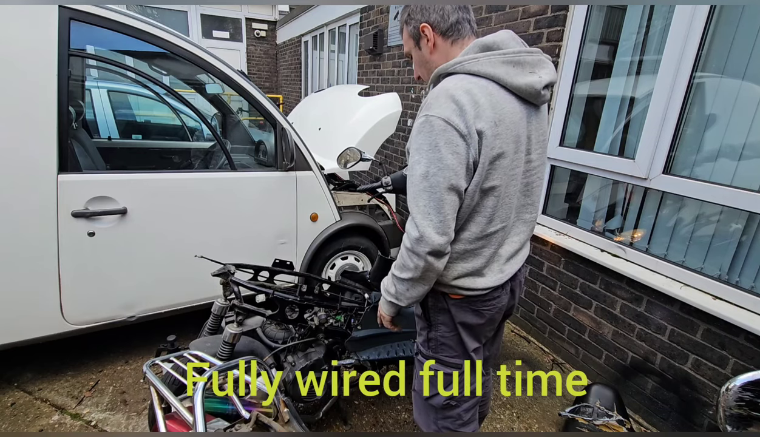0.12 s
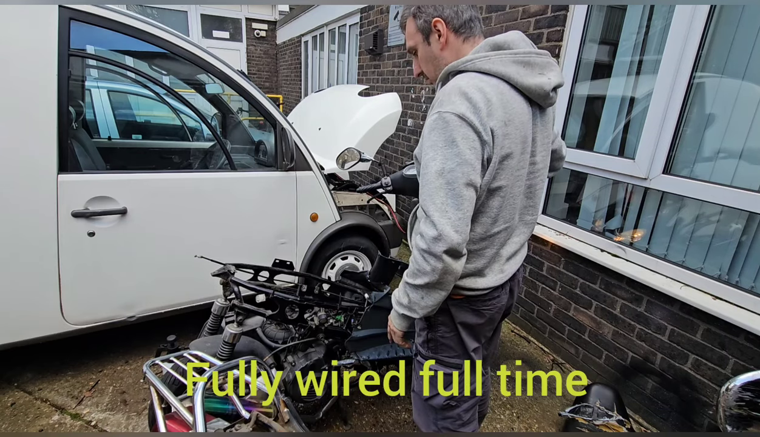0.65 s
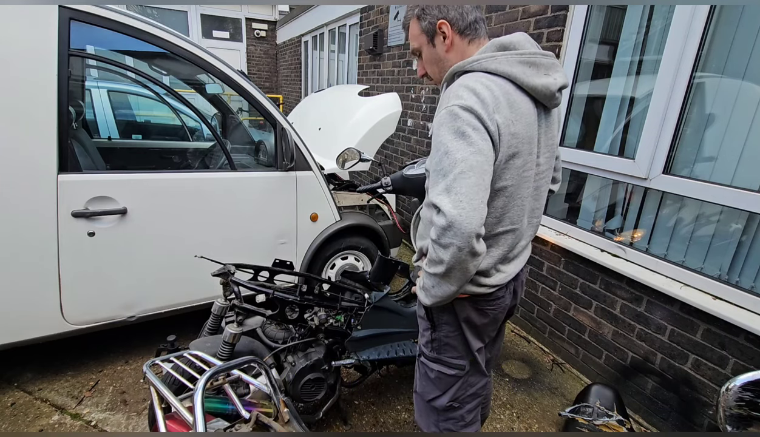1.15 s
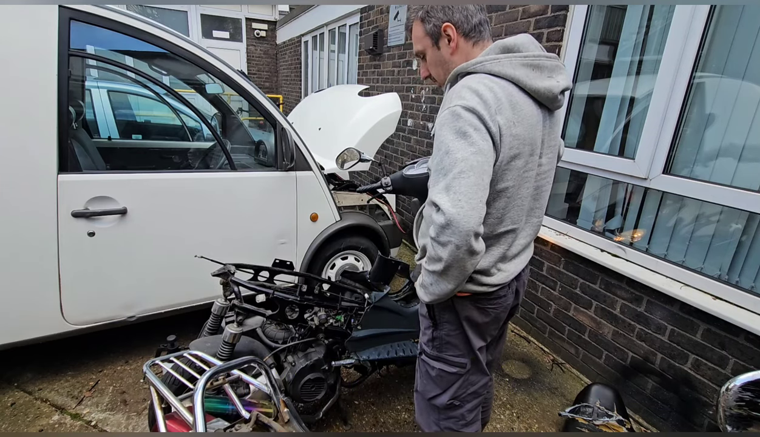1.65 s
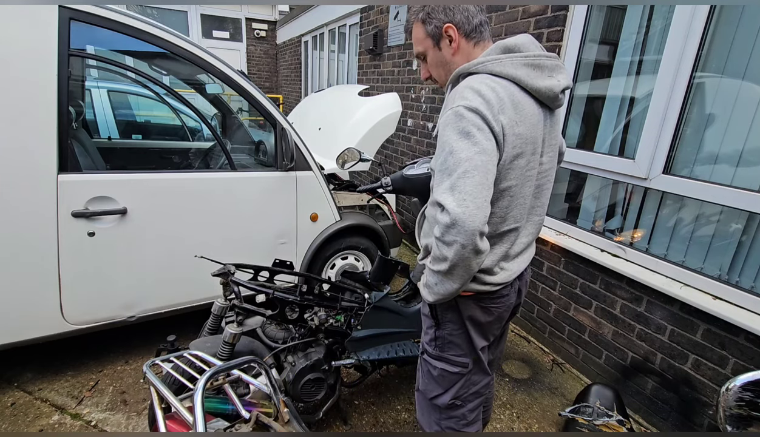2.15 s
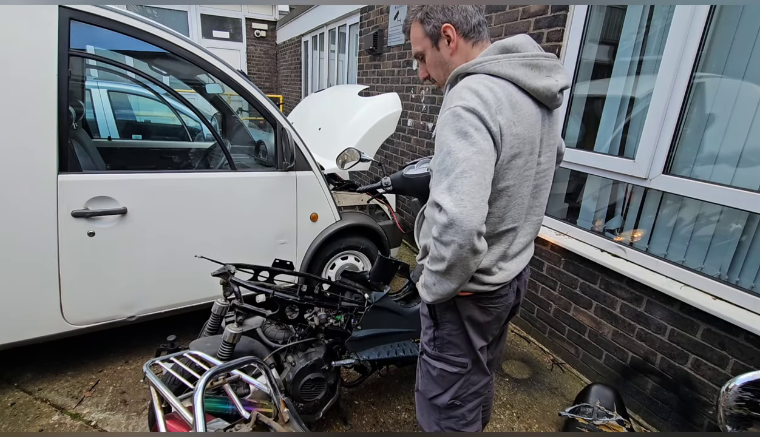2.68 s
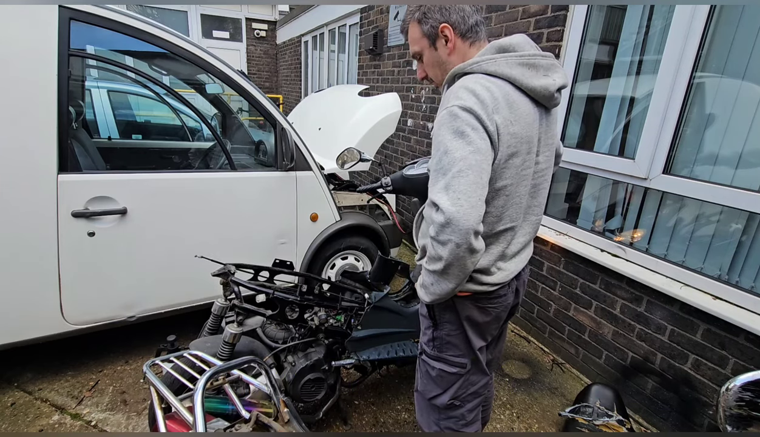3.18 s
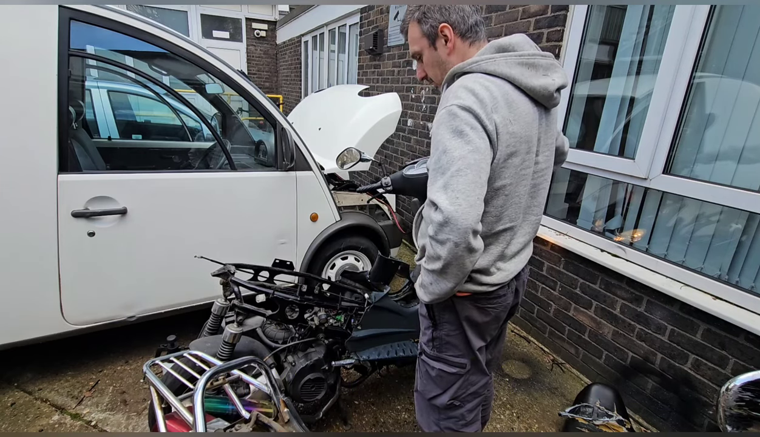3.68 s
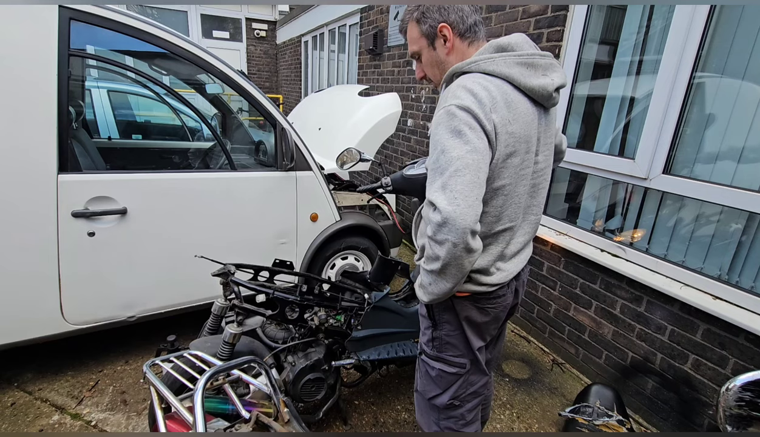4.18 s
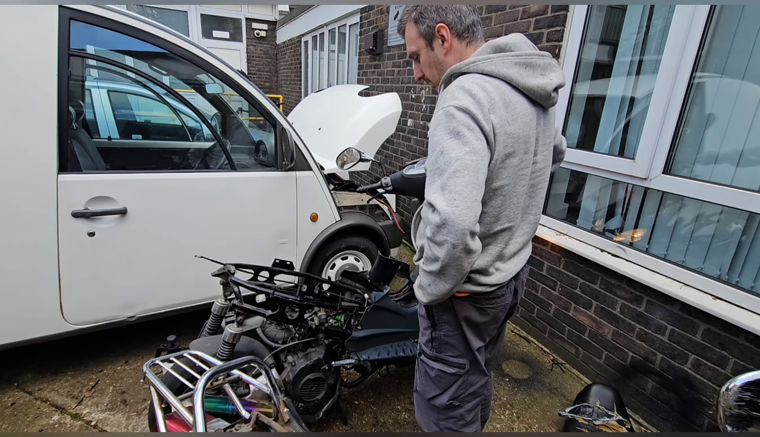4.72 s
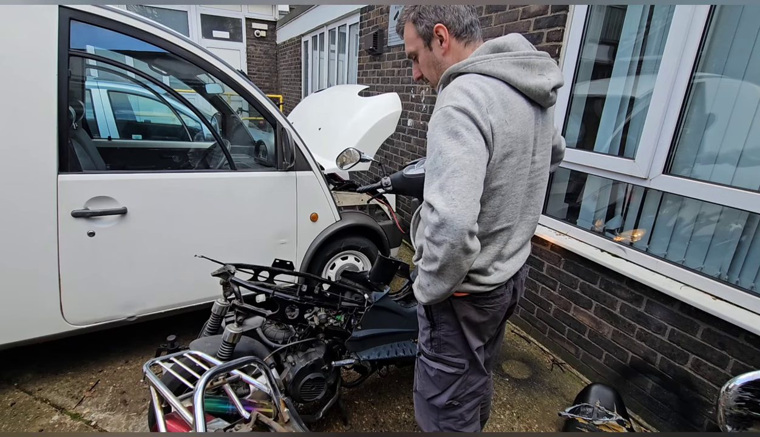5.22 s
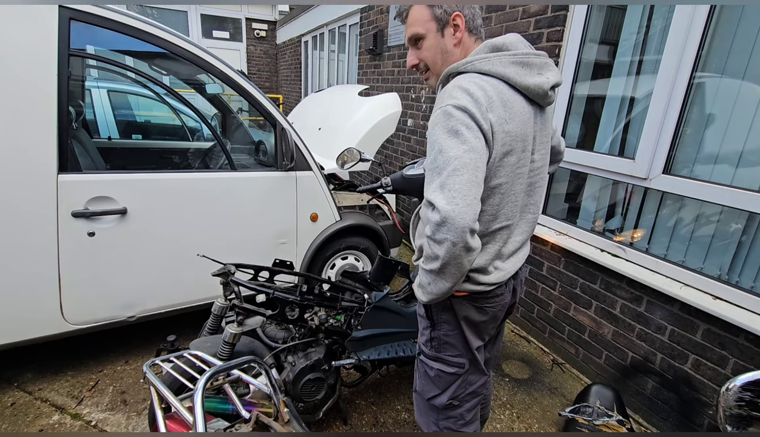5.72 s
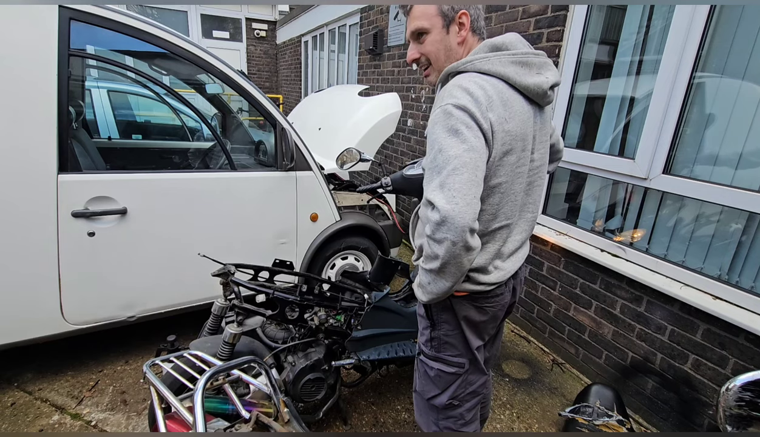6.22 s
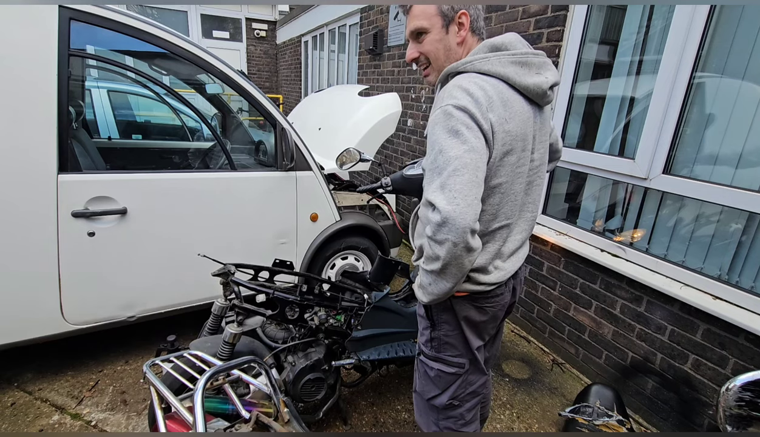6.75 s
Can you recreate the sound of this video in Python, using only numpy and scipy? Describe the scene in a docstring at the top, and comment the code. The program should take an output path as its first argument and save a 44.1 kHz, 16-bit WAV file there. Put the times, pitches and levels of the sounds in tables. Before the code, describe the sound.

From 0 to 2 s a small single-cylinder four-stroke engine idles close by, about ten to twelve soft exhaust thuds a second, each with a hollow silencer shiver, a little puff of gas and crisp metallic valve ticks. At 2.1 s the throttle snaps open: the beat doubles and a hard intake bark appears. Quick blips follow at 2.7, 3.1 and 3.7 s, each rising, then sagging with a small exhaust thump as it shuts. From 4.25 to 5.3 s a longer pull climbs steeply; the separate strokes fuse into a low buzzing note with a nasal pipe resonance and bright hiss. It dips, then rises again from 5.7 s to the highest, loudest rev near 6.4 s, falls slightly, and is opened once more at 6.7 s, ending still fast near 7 s. Short echoes from brick wall and car surround it, in close stereo.

```python
"""Small engine idling and blipped

A small single-cylinder four-stroke idles, then is revved ever higher in short throttle blips.
Each cycle rings pipe and case modes: an exhaust thud, a silencer shiver at idle, an intake bark when open,
a valve tick. Shaped noise gives the puffs of gas hiss; at speed the thuds merge into a note of firing orders.
A brick wall and a parked car close by throw short echoes to a two-port microphone."""
import sys
import numpy as np
from scipy import signal
from scipy.io import wavfile
from scipy.ndimage import uniform_filter1d

SR = 44100
rng = np.random.default_rng(int(sys.argv[2]) if len(sys.argv) > 2 else 0)


def master(y):
    """Save y as 16-bit WAV."""
    cut = np.clip(np.atleast_2d(y).T, -1, 1)
    pcm = np.round(cut * 32767)  # scale
    wavfile.write(sys.argv[1], SR, pcm.astype(np.int16))


def undo_db(level):
    """Turn decibels back into plain size, where 20 dB means ten times bigger."""
    steps = np.asarray(level, float) / 20
    return 10 ** steps


N = 302526
EARLY_SAMPLES = SR // 5  # room ahead of the start, so that the stroke before it still rings
START_TURN = -.48  # firing cycles

# Crank speed. Each row: time in seconds, firing cycles a second in Hz.
SPEED = [(0.0, 10.289), (0.71, 11.577), (1.02, 11.489), (1.62, 12.319), (2.1, 12.146), (2.42, 25.746),
         (2.68, 20.329), (2.93, 31.683), (3.15, 28.32), (3.34, 33.529), (3.41, 33.394), (3.58, 25.709),
         (3.74, 25.585), (4.02, 39.335), (4.08, 39.439), (4.29, 34.501), (4.82, 53.961), (5.27, 64.344),
         (5.39, 63.21), (5.57, 55.119), (5.72, 52.343), (6.12, 71.781), (6.34, 78.175), (6.43, 77.754),
         (6.67, 66.952), (6.86, 65.551)]
# Throttle blips. Each row: opening in seconds, shutting in seconds, strength in dB.
BLIPS = [(2.074, 2.434, -1), (2.664, 2.96, 0), (3.127, 3.359, 0.5), (3.694, 4.036, 0.5), (4.249, 5.342, -1),
         (5.662, 6.39, 1), (6.697, 6.95, -1)]
OPEN_S, SHUT_S, FLOW_LAG_S = 0.036, 0.078, 0.27  # plate travel, plate travel, delay of the gas flow
SNAP_S, SNAP_BARK_DB = 0.034, -4  # just after opening the bark is still weak
POP_S, POP_DB = 0.01, 10.5  # the thud swells as the plate shuts on a full pipe
# Engine map, throttle open and shut. Each row: firing rate in Hz, then thud, bark, inlet edge and gas hiss
# in dB before trims.
MAP_OPEN = [(12, -19, -25, -32.5, -42), (22.6, -20, -21.5, -35, -43), (34, -25.5, -19, -29.5, -38.5),
            (44.8, -24, -16.5, -26, -35.5), (62, -20, -22, -25.5, -29.5), (79, -20, -20, -29, -29)]
MAP_SHUT = [(9.7, -19, -36, -50, -47), (12.5, -20, -35, -48, -49.5), (21.8, -21, -34, -50.5, -51.5),
            (33, -18.5, -37, -50, -45), (55, -6, -25, -76, -33), (75, -20, -27.5, -55, -37.5)]

# Gas noise spectrum at idle. Each row: frequency in Hz, relative density in dB per Hz.
HISS_IDLE = [(150, -24), (250, 15), (303, -7), (445, -2.5), (642, -3), (751, 2), (942, -12.5), (1310, -8.5),
             (2290, -19), (3030, -14.5), (3370, -20), (4300, -19), (11400, -31), (12900, -29),
             (16200, -27.5)]
# Low end of the gas noise at speed. Each row: as HISS_IDLE.
ROAR = [(50, 0), (300, 5), (600, 0), (1200, -3)]
# Gas noise spectrum at speed, low end included. Each row: as HISS_IDLE.
HISS_FAST = ROAR + [(1120, -32), (1900, -8.5), (2770, -17.0), (4830, -10.5), (6550, -13.5), (8420, -11.5),
             (9890, -15.5), (11000, -15.5), (12700, -9), (15200, -11.0), (16200, -42)][1:]
# Phase of the hiss between ports. Each row: frequency in Hz, lead of the left port in radians.
HISS_LEAD = [(0, 30.5), (1210, 0.3), (1460, 2), (2500, 2), (4050, 3.4), (5000, 1.34), (6890, 1),
             (8010, 4.5), (8610, 6.5), (10500, 7), (11800, 3), (12800, 29), (13600, -44), (16500, 60)]

# Modes of the engine cases, struck by the valves.
# Each row: frequency in Hz, relative level in dB, t60 in seconds, rise in seconds.
CASES = [(1810, 7.5, 0.026, 0.00017), (3034, -1.5, 0.065, 0.00012), (3580, -6, 0.053, 0.00014),
         (4780, 5, 0.025, 0.00034), (8470, 9.5, 0.0078, 0.00011), (12500, 10.5, 0.0064, .0001)]
# Modes of the silencer shell, shaken by the weak burn at idle. Each row: as CASES.
SHELL = [(62.4, -4.5, 0.26, 0.0017), (103.1, 11, 0.31, 0.049), (148.8, -4, 0.39, 0.0081),
         (277, 7.5, 0.034, 0.0094), (344.6, -15, 0.17, 0.002), (370, -1, 0.092, 0.0039),
         (447, 2, 0.087, 0.0077), (600, 0, 0.03, 0.011), (745, -3.5, 0.14, 0.016), (792, -4, 0.14, 0.019),
         (829, -3.5, 0.097, 0.019), (1004, -23, 0.15, .004), (1313, -18.5, 0.099, 0.0013)]
# Mode of the header pipe, rung by a strong burn. Each row: as CASES.
HEADER = [(205, 0, 0.3, 0.0047)]
HEADER_DB, HEADER_LAG_S = -5, 0.044  # level against the bark; it dies later than the bark
# Modes of the air box. Each row: as CASES.
AIRBOX = [(201, 7.5, 0.036, 0.0023), (259.3, 0, 0.066, 0.0028), (351.6, 3.5, 0.053, 0.0011),
          (428.4, 3, 0.03, 0.0014), (512.5, 1.5, 0.021, 0.0015)]
# Modes of the inlet tract. Each row: as CASES.
INLET = [(694, 12.5, 0.018, 0.00016), (810, 1.5, 0.053, 0.00018), (975, 7, 0.028, 0.00021),
         (1144, -6.5, 0.081, 0.00046), (1233.4, 7.5, 0.033, 0.0006), (1355, -10.5, 0.048, 0.00048),
         (1630, -13, 0.036, 0.00038), (1800, -14.5, 0.22, 0.00021)]
# Modes of silencer and pipe. Each row: as CASES.
SILENCER = [(64, -10.5, 0.54, 0.018), (108.9, 3, 0.16, 0.0072), (128.3, 8.5, 0.094, 0.003),
            (207.7, -8.5, 0.53, 0.036)]
# Pipe resonance of the fast bark, throttle open. Each row: firing rate in Hz, resonance in Hz, gain in dB.
SING_OPEN = [(44, 470, -11), (53.3, 494, 1), (61.3, 640, 6.5), (65, 460, -4), (76, 457, 3.5)]
SING_SHUT_HZ, SING_SHUT_DB = 360, -6.5  # the same resonance, throttle shut
# Passage of low tones through pipe and yard, throttle open and shut.
# Each row: frequency in Hz, relative gain in dB.
PIPE_OPEN = [(40, -34), (44, -30), (50, -21), (62, -15.5), (66, -21), (69, -31), (72, -21), (79, -18),
             (85, -19), (93, -19), (100, -23), (108, -12), (120, -14.5), (135, -18), (150, -19),
             (170, -38.5), (190, -28), (205, -21.5), (220, -57), (235, -34)]
PIPE_SHUT = [(54, -29), (62, -17), (68, -36), (75, -22), (112, -14), (122, -25), (140, -16), (160, -15.5),
             (170, -19), (180, -17.5), (200, -12), (213, -41), (222, -16), (235, -43)]

# Echoes of wall, car and paving.
# Each row: left delay in seconds, right delay in seconds (before the port lag), relative level in dB.
ECHOES = [(.0021, 0.00228, -14), (.0047, 0.00438, -13.5), (.0078, .0086, -37.5), (0.0105, .0116, -20),
          (0.021, 0.023, -12.5)]
PORT_LAG_S = .00022  # right port after left
SCATTER_DB, SCATTER_T60_S = -8, 0.17


def evened(x):
    """Scales to rms 1."""
    return x / np.sqrt(np.mean(x ** 2) + 1e-20)


def curve(rows):
    """Columns of a time table, one value a sample."""
    s, *columns = np.transpose(rows)
    return [np.interp(np.arange(N) / SR, s, c) for c in columns]


def read(points, hz):
    """Reads a spectrum table on a log-frequency axis."""
    f, value = np.transpose(points)
    return np.interp(np.log(hz + 1), np.log(f + 1), value)


def lowpass(x, order, cutoff_hz):
    """Zero-phase Butterworth low-pass, run both ways."""
    return signal.sosfiltfilt(signal.butter(order, cutoff_hz, fs=SR, output="sos"), x)


def lagged(x, lag_s):
    """One-pole lag with the given time constant, starting from zero."""
    keep = np.exp(-1 / (lag_s * SR))
    return signal.lfilter([1 - keep], [1, -keep], x)


def turns():
    """Firing cycles run so far: the integral of the firing rate."""
    return START_TURN + np.cumsum(curve(SPEED)[0]) / SR


def strokes(at_turn, lag_s):
    """Sample of one event in every cycle, at a crank angle plus the travel time of the gas."""
    at = np.flatnonzero(np.diff(np.floor(turns() - at_turn))) + round(lag_s * SR)
    before_start = 2 * at[0] - at[1]
    return np.r_[before_start, at[at < N]]


def repeat(shape, at, size):
    """One copy of the shape at every stroke."""
    train = np.zeros(N + EARLY_SAMPLES)
    train[at + EARLY_SAMPLES] = size
    return signal.oaconvolve(train, shape)[EARLY_SAMPLES:][:N]


def ring(at, level_db, modes, uneven_db, detune, count=5):
    """Each stroke rings one of a few detuned sets of modes; level_db is the nominal rms of the train."""
    t, out, now = np.arange(SR // 2) / SR, np.zeros(N), np.maximum(at, 0)
    chance = rng.standard_normal(400)[:len(at)]
    pick = rng.integers(0, count, 400)[:len(at)]
    # fewer strokes a second need more energy each
    size = undo_db(level_db[now] + uneven_db * chance) * np.sqrt(SR / curve(SPEED)[0][now])
    bends = 1 + detune * rng.standard_normal((count, len(modes)))
    for k, bend in enumerate(bends):
        blow = np.zeros(len(t))
        for (hz, db, t60, rise), b in zip(modes, bend):
            envelope = undo_db(db - 60 * t / t60) * (1 - np.exp(-t / rise))
            blow += envelope * np.sin(2 * np.pi * hz * b * t)
        out += repeat(blow / np.linalg.norm(blow), at[pick == k], size[pick == k])
    return out


def throttle():
    """Plate opening 0-1, blip strength in dB, and two bumps: just after opening and on shutting."""
    t, (opens, shuts, hard_db) = np.arange(N) / SR, np.transpose(BLIPS)[:, :, None]
    plate = np.clip((t - opens) / OPEN_S, 0, 1) * np.clip(1 - (t - shuts) / SHUT_S, 0, 1)
    snap = plate * np.exp(-np.maximum(t - opens, 0) / SNAP_S)
    pop = np.exp(-((t - shuts) / POP_S) ** 2)
    return plate.sum(0), (plate * hard_db).sum(0), snap.sum(0), pop.sum(0)


def load():
    """Levels of thud, bark, inlet edge and hiss, from the engine map by speed and throttle."""
    plate, hard_db, snap, pop = throttle()
    speed_hz = curve(SPEED)[0]
    flow = np.maximum(plate, lagged(plate, FLOW_LAG_S))  # the gas flows on after the plate shuts
    open_hz, *open_columns = np.transpose(MAP_OPEN)
    shut_hz, *shut_columns = np.transpose(MAP_SHUT)
    bark_extra_db = hard_db + SNAP_BARK_DB * snap
    shares = plate, plate, plate, flow
    extras_db = POP_DB * pop, bark_extra_db, bark_extra_db, hard_db / 2
    levels = []
    for wide, closed, share, extra_db in zip(open_columns, shut_columns, shares, extras_db):
        wide_db, shut_db = np.interp(speed_hz, open_hz, wide), np.interp(speed_hz, shut_hz, closed)
        levels.append(shut_db + share * (wide_db - shut_db) + extra_db)
    return levels


def idling():
    """Share of idle, 1 at low speed, 0 above 14 firings a second."""
    return np.clip((14 - curve(SPEED)[0]) / 1.53, 0, 1)


def merging():
    """Share of separate strokes merged into a tone, 0 below 40.5 firings a second."""
    return np.clip((curve(SPEED)[0] - 40.5) / 4, 0, 1)


def puffs(steady, parts):
    """Gas flow through the cycle, local rms 1; parts are (turn, lag s, relative dB, rise s, decay s)."""
    t, flow = np.arange(SR // 6) / SR, steady
    for turn, lag_s, db, rise, decay in parts:
        at = strokes(turn, lag_s)
        size = undo_db(db + 2.4 * rng.standard_normal(400)[:len(at)])
        flow = flow + repeat((1 - np.exp(-t / rise)) * np.exp(-t / decay), at, size)
    power = uniform_filter1d(uniform_filter1d(flow ** 2, size=4000), size=4000)
    return flow / np.sqrt(power)


def hiss(level_db):
    """Turbulent gas and chain noise, shaped in the STFT, brightening off idle, puffed by the strokes."""
    frames, hz = N // 128 + 5, np.fft.rfftfreq(512, 1 / SR)
    a, b, c, d, patches = rng.standard_normal((frames, 257, 5)).T
    patches = uniform_filter1d(uniform_filter1d(patches, size=10, axis=0), size=8, axis=1)
    frame_speed_hz = np.interp(np.arange(frames) * 128 / SR, *np.transpose(SPEED))
    fast = np.clip((frame_speed_hz - 12.3) / 14, 0, 1)
    colour = undo_db(np.outer(read(HISS_IDLE, hz), 1 - fast) + np.outer(read(HISS_FAST, hz), fast))
    colour /= np.linalg.norm(colour[hz > 3000], axis=0)
    # the ports share the bass, little of the treble
    same = np.clip(0.085 + .5 / (1 + (hz[:, None] / 600) ** 2), 0, 1)
    left = a + 1j * b
    right = same * left + np.sqrt(1 - same ** 2) * (c + 1j * d)
    right = right * np.exp(-1j * read(HISS_LEAD, hz))[:, None]
    z = np.array([left, right]) * colour * undo_db(1.1 * evened(patches))
    noise = signal.istft(z, nperseg=512, noverlap=384)[1][:, :N]
    steady = 0.19 + 0.86 * np.clip((curve(SPEED)[0] - 13) / 9, 0, 1)
    flow = puffs(steady, [(0, -0.011, 2.5, 0.004, 0.033), (.42, -0.0206, -27, 0.0014, 0.042)])
    top = signal.sosfilt(signal.butter(2, 6000, "high", fs=SR, output="sos"), noise)
    gusty = flow * noise + (flow ** 1.67 - flow) * top  # the treble puffs harder than the rest
    port_gain = undo_db(np.array([[.8], [-.8]]))  # dB, left and right
    return undo_db(level_db - 2.17) * gusty / top.std() * port_gain


def ticks(hiss_db):
    """Valves strike the engine cases twice a cycle; level follows the hiss."""
    first = ring(strokes(.45, 0), hiss_db - 15.0, CASES, uneven_db=2.5, detune=0.038)
    return first + ring(strokes(0, -.003), hiss_db - 13.5, CASES, uneven_db=0.5, detune=0.045)


def shell(bark_db):
    """Silencer shell modes shaken by the weak burn at idle, 50 dB down off idle."""
    level_db = bark_db + 8.5 - 50 * (1 - idling())
    return ring(strokes(0, 0.00322), level_db, SHELL, uneven_db=0.3, detune=.012)


def header(bark_db):
    """One pipe tone, following the bark late and fading below 24 and above 52 firings a second."""
    speed_hz = curve(SPEED)[0]
    late_db = lagged(bark_db - bark_db[0], HEADER_LAG_S) + bark_db[0]
    fade_db = -1.2 * np.maximum(speed_hz - 52, 0) - 1.2 * np.maximum(24 - speed_hz, 0)
    return ring(strokes(-0.072, 0.0018), late_db + HEADER_DB + fade_db, HEADER, uneven_db=2.7, detune=0.0049)


def sing(x, width_hz):
    """Moving pipe resonance: shifts it down to zero, smooths, and shifts back."""
    plate, (rate_hz, *columns) = throttle()[0], np.transpose(SING_OPEN)
    open_hz, open_db = (np.interp(curve(SPEED)[0], rate_hz, c) for c in columns)
    hz = SING_SHUT_HZ + plate * (open_hz - SING_SHUT_HZ)
    db = SING_SHUT_DB + plate * (open_db - SING_SHUT_DB)
    turn = np.exp(2j * np.pi * np.cumsum(hz) / SR)
    r = np.exp(-np.pi * width_hz / SR)
    return 2 * undo_db(db) * (turn * signal.lfilter([1 - r], [1, -r], x / turn)).real


def bark(bark_db, edge_db):
    """Intake strokes ring air box and inlet tract; at speed the air box loses bass and sings in the pipe."""
    muffle_db = -30 * idling()  # at idle the shut throttle plate muffles the inlet
    even = dict(uneven_db=.6, detune=.002)
    box = ring(strokes(-0.0715, 0.00019), bark_db + muffle_db, AIRBOX, **even)
    box += merging() * (sing(box, width_hz=56) - lowpass(box, 3, 185))
    return box + ring(strokes(-0.07414, 0.00039), edge_db + muffle_db, INLET, **even)


def note():
    """Exhaust note at speed: three clean orders of the firing rate, troughs aligned at 0.16 cycle."""
    waver_db = 1.3 * evened(uniform_filter1d(rng.standard_normal((N, 3)), size=900, axis=0)).T
    plate, hz = throttle()[0], curve(SPEED)[0] * np.arange(1, 4)[:, None]
    orders_db = plate * read(PIPE_OPEN, hz) + (1 - plate) * read(PIPE_SHUT, hz)
    orders_db = orders_db + waver_db  # no two burns are alike
    phase = 2 * np.pi * (turns() - .16)
    return -sum(np.sqrt(2) * undo_db(db) * np.cos((k + 1) * phase) for k, db in enumerate(orders_db))


def thud(thud_db):
    """Exhaust strokes ring silencer and pipe, giving way to the note at speed."""
    merged = merging()
    at = strokes(0, -0.00057)
    hot = 1 - idling()[np.maximum(at, 0)]
    at -= (0.0047 * SR * hot).astype(int)  # off idle the hotter gas runs down the pipe sooner
    blows = (1 - merged) * ring(at, thud_db - .6, SILENCER, uneven_db=0.6, detune=0.029)
    blows = lowpass(blows, 2, 320)  # the packing softens the edge
    return blows + merged * note() * undo_db(-6.5)


def yard(x, right_db, wet_db):
    """Direct sound, later at the right port, then the echoes of the near surfaces."""
    taps = np.zeros((2, SR // 20))
    taps[0, 0], taps[1, round(PORT_LAG_S * SR)] = 1, undo_db(right_db)
    for left_s, right_s, db in ECHOES:
        taps[0, round(left_s * SR)] += undo_db(db + wet_db)
        taps[1, round((right_s + PORT_LAG_S) * SR)] += undo_db(db + wet_db)
    return signal.oaconvolve(x[None], taps, axes=1)[:, :N]


def scatter(x):
    """Clutter of parts and walls: sparse decaying taps of random sign, mostly shared by the two ports."""
    size = SR // 6
    taps, slots = np.zeros((3, size)), np.arange(200, size - 22, 22)  # one tap every half millisecond
    at = slots + rng.integers(0, 22, (3, len(slots)))
    np.put_along_axis(taps, at, rng.choice([-1., 1.], at.shape), axis=1)
    taps = (taps[:1] + 0.31 * taps[1:]) * undo_db(-60 * np.arange(size) / SR / SCATTER_T60_S)
    return undo_db(SCATTER_DB) * signal.oaconvolve(x[None], taps / np.linalg.norm(taps[0]), axes=1)[:, :N]


def scene():
    """Hiss, then ticks and bark, then header, shell and thud, the engine parts through the yard."""
    thud_db, bark_db, edge_db, hiss_db = load()
    gas = hiss(hiss_db)
    sharp = ticks(hiss_db) + bark(bark_db, edge_db)
    exhaust = header(bark_db) + shell(bark_db) + thud(thud_db)
    near = yard(exhaust, right_db=-0.14, wet_db=-12.5) + yard(sharp, right_db=-1.6, wet_db=-1.9)
    return near + scatter(sharp) + gas


def band_limit(x):
    """A steep low-pass at the top of the band."""
    return signal.sosfilt(signal.butter(12, 16940, fs=SR, output="sos"), x)


def record(dry):
    """Bass roll-off of the microphone, then a soft ceiling on the peaks."""
    thin = signal.sosfilt(signal.butter(2, 42, "high", fs=SR, output="sos"), dry)
    mix = 1.453 * np.tanh(thin / 1.007)
    return band_limit(mix)


dry = scene()
out = record(dry)
master(out)
```